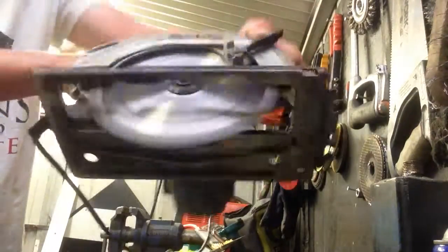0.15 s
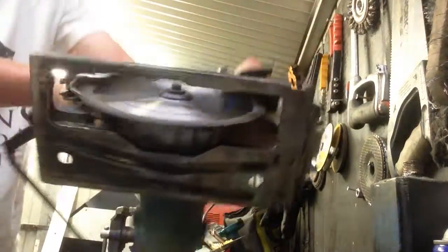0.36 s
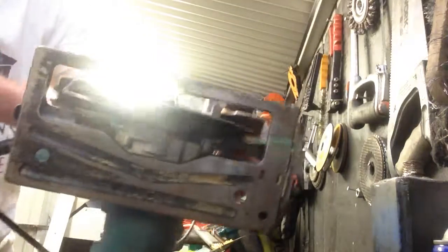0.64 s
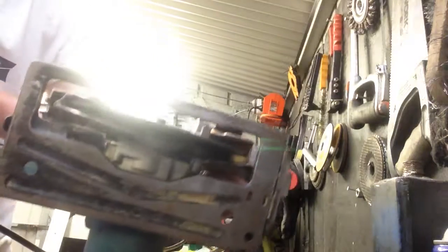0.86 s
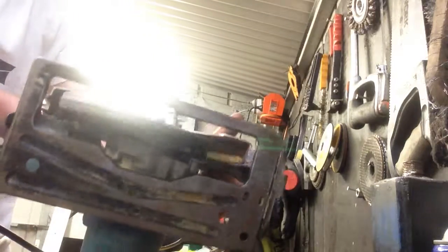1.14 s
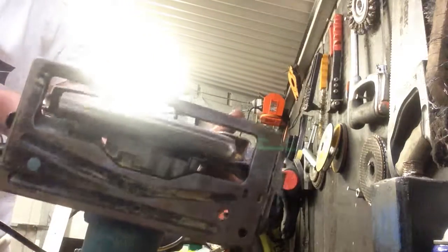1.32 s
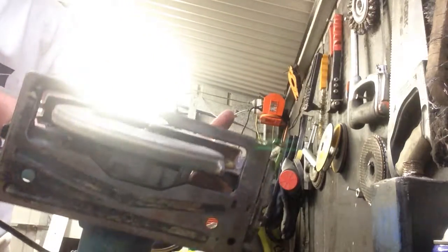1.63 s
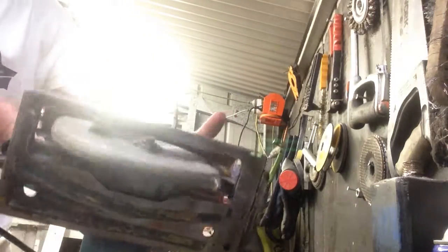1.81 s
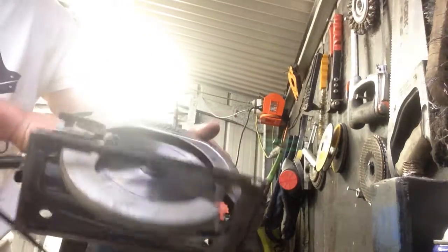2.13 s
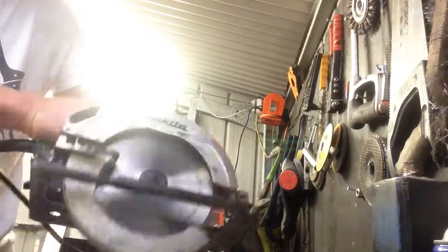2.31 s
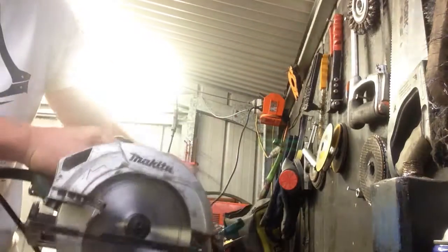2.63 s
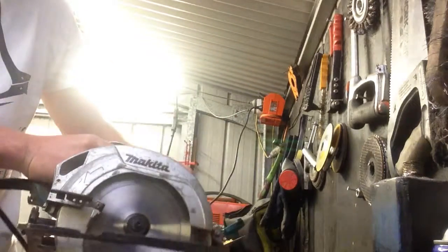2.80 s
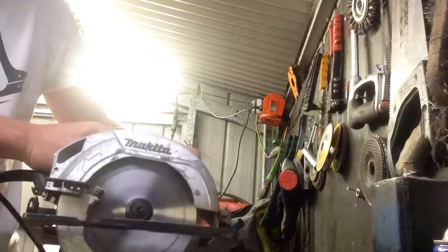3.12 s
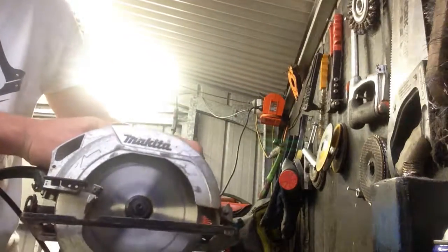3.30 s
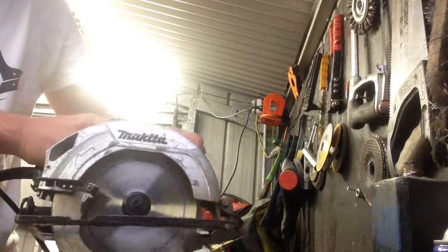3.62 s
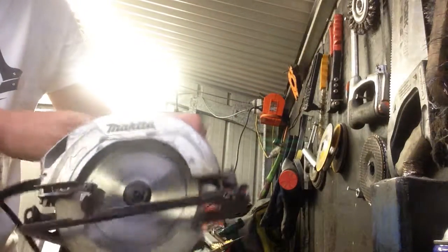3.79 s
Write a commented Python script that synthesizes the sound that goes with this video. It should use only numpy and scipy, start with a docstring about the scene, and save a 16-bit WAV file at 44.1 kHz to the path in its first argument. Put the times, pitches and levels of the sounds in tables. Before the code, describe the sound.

Close recording of a freewheeling circular saw slowing down: bright rattling whine and airy fan rush sink in pitch and level, guard clatters briefly, metal rasps later, with short, dry small-room reflections.

```python
"""Circular saw coasting down

A handheld circular saw coasts with the power off in a small workshop, slowing but still turning at the end.
Worn gears give a falling whine of tooth-rate harmonics and rattle in tone bursts, 27 to 59 a second.
Tooth noise and burst force make the steel blade ring; shaped noise gives fan rush and scraping.
The loose guard's knocks and ticks are short noise blows through resonances."""
import sys
import numpy as np
from scipy import signal
from scipy.fft import rfft, irfft, next_fast_len
from scipy.io import wavfile
from scipy.ndimage import uniform_filter1d

SR = 44100
rng = np.random.default_rng(int(sys.argv[2]) if len(sys.argv) > 2 else 0)


def int16_out(signal):
    """Quantize to a 16-bit WAV file."""
    q = np.round(np.clip(np.atleast_2d(signal).T, -1, 1) * 32767)
    wavfile.write(sys.argv[1], SR, q.astype(np.int16))


N = 174195
T = np.arange(N) / SR  # s

# Workshop background noise [f/Hz, relative density level/dB]
FLOOR = [(20, -39), (30, -27), (45, -3), (70, -2), (130, -0.5), (280, 4), (450, -15), (900, 6),
         (3000, -12.5), (15000, -44)]
# Workshop hum [f/Hz, level/dB]
HUM = [(100, -68.5), (285, -61)]
# Knocks of the guard [t/s, level/dB, contact decay/s, f/Hz, width/Hz]
KNOCKS = [(1.167, -26, 0.0014, 2000, 70), (1.214, -29, 0.0087, 1480, 400), (1.235, -29, 0.0078, 2260, 1640),
          (1.241, -29.5, 0.0019, 1420, 160), (1.245, -26, 0.0054, 1920, 800), (1.265, -32, .005, 1450, 400),
          (1.2856, -23, 0.0023, 1570, 380), (1.299, -36, 0.0029, 1570, 350),
          (1.33, -31.5, 0.0052, 1580, 220), (2.516, -35.5, 0.00066, 2050, 1500),
          (3.042, -43, 0.0018, 2500, 2170), (3.327, -40, 0.00065, 2500, 2200),
          (3.353, -50, 0.0012, 2230, 2200), (3.494, -41, 0.0025, 1820, 1500),
          (3.549, -36, 0.0011, 1700, 1200), (3.569, -38, 0.00079, 2300, 2200),
          (3.773, -43, 0.0032, 1460, 300), (3.882, -38, 0.0037, 1400, 500)]
# What the guard rings with [f/Hz, width/Hz, relative level/dB]
GUARD_MODES = [(1420, 45, -6), (1400, 50, -3), (1743, 33, 17), (1970, 91, 12), (2360, 90, -9),
               (3370, 90, -8)]
# Colour of the fan and blade air [f/Hz, relative density level/dB]
AIR = [(20, -59), (60, -34), (110, -19), (190, -7.5), (270, -5.5), (380, -2), (490, -4.5), (620, 8.5),
       (760, -4), (1300, 9.5), (1600, 1), (2300, 5.5), (4500, -1.5), (8000, -4), (12000, -8), (15500, -16)]
# Light scraping as the blade brushes the guard [t/s, level/dB]
SCRAPE_LEVEL = [(0, -51), (2.38, -30), (2.48, -32), (2.63, -28.5), (2.72, -33), (3.0, -33), (3.5, -33),
                (3.62, -31), (3.95, -39)]
# Colour of that scraping [f/Hz, relative density level/dB]
SCRAPE = [(20, -53), (450, -37), (900, -1), (1300, 19.5), (2400, -1.5), (3200, 4), (4200, 0), (5200, -29),
          (7400, -2), (9500, -10.5), (15000, -24)]
# The harder rub [t/s, level/dB]
RUB_LEVEL = [(0, -66), (2.36, -75), (2.46, -25), (2.53, -31), (2.58, -37), (2.63, -27), (2.7, -65),
             (3.0, -58), (3.95, -68.5)]
# Steel that the rub rings [f/Hz, width/Hz, relative level/dB]
RUB_MODES = [(3048, 110, 0), (3260, 190, 1), (3480, 130, -.5)]
# Noise of the tooth impacts [f/Hz, relative density level/dB]
IMPACTS = [(20, -76), (150, -56), (480, -19), (620, -4.5), (800, 0), (1100, -12.5), (1350, -1), (1800, -2),
           (2200, 4.5), (2600, 5), (3100, 2.5), (5000, -2.5), (7200, -3), (9500, -14), (12000, -25),
           (15500, -23.5)]
# Treble of the fast tooth impacts [f/Hz, relative density level/dB]
SIZZLE = [(20, -64), (7000, -58), (10300, 4), (11400, 12), (12700, -4), (13800, -1), (15200, -8),
          (16000, -18)]
# Blade and housing modes [f/Hz, width/Hz, relative level/dB]
MODES = [(615, 50, -8), (912, 30, -9), (1400, 35, -1), (1650, 40, -6), (2283, 35, -1), (2388, 20, -5),
         (2793, 35, -1), (3048, 45, -3), (3305, 25, -8), (6003, 50, -13), (6910, 60, -12), (7180, 160, -7),
         (11250, 200, -8), (11350, 30, -9), (13700, 250, -15)]
# The blade's strongest ring [f/Hz, width/Hz, relative level/dB]
BLADE_MODES = [(3822, 40, 0), (3896, 50, 1)]
# Swell and fade of that strongest ring [t/s, level/dB]
BLADE_LEVEL = [(0, -31), (.28, -36), (.43, -17), (.56, -17), (.7, -19.5), (.8, -23), (.95, -29.5),
               (1.04, -29.5), (1.16, -35), (1.3, -36), (1.5, -39.5), (1.62, -37), (1.9, -31), (2.0, -36),
               (2.08, -20.5), (2.25, -40.5), (2.42, -34.5), (2.57, -24), (2.7, -36), (2.81, -28.5),
               (2.87, -27.5), (2.95, -26), (3.03, -34), (3.09, -28), (3.24, -32), (3.33, -30.5),
               (3.52, -22), (3.68, -36), (3.88, -25.5), (3.95, -28.5)]
# The blade's thin high ring [t/s, level/dB]
HIGH_RING_LEVEL = [(0, -61), (2.3, -84), (2.42, -37), (2.85, -33), (3.1, -48), (3.68, -42), (3.95, -58)]
# The blade's topmost ring [t/s, level/dB]
TOP_RING_LEVEL = [(0, -34.5), (.22, -35), (.34, -41), (1.2, -69), (1.4, -76), (2.1, -35), (2.3, -57),
                  (2.7, -44), (3.2, -47.5), (3.5, -47), (3.95, -65)]
# Other blade notes that swell briefly [peak t/s, half length to 1/e t/s, f/Hz, level/dB]
SWELLS = [(0.552, .12, 6050, -31), (0.757, 0.36, 2093, -28.5), (1.017, 0.051, 6980, -35),
          (1.318, 0.047, 3334, -23), (1.54, 0.21, 4470, -35), (2.38, 0.29, 2284, -30.5),
          (2.985, 0.15, 2793, -29), (1.95, 0.31, 1380, -29.5), (3.3, 0.21, 1654, -32.5)]
# Bright chirp that each burst draws from the blade [f/Hz, width/Hz, relative level/dB]
CHIRP_MODES = [(7120, 380, 0), (11280, 300, -6)]
# Level of that chirp [t/s, level/dB]
CHIRP_LEVEL = [(0, -43), (1.35, -37.5), (1.5, -36.5), (1.8, -30), (2.05, -47), (2.3, -35.5), (2.5, -47),
               (3.6, -38), (3.8, -34), (3.95, -48)]
# How the casing radiates the gear tones [f/Hz, relative gain level/dB]
CASING = [(500, -27.5), (750, -16.5), (900, 2), (1080, -6), (1350, 4.5), (1700, -4), (2150, -1.5),
          (2550, -8.5), (2820, 3), (3100, 5.5), (3500, -12), (3900, 0.5), (4500, -5.5), (5000, -7),
          (6300, -6.5), (7150, -4), (7600, -4.5), (8300, -0.5), (9500, -11), (15000, -58)]
# Steady part of the whine [multiple of the mesh rate, relative level/dB]
STEADY_ORDERS = [(1, -3), (2, -4), (3, -16)]
# Level of the steady whine [t/s, level/dB]
STEADY_LEVEL = [(0, -32), (.9, -45), (1.2, -34), (1.35, -44), (1.7, -42), (1.9, -37), (2.35, -38),
                (2.55, -35), (2.95, -33.5), (3.3, -32.5), (3.6, -35), (3.95, -34)]
# Rattle rate of the gears [t/s, bursts per second/Hz]
CHATTER = [(0.0, 58.81), (0.45, 52.8), (0.9, 46.34), (1.29, 42.74), (1.34, 33.62), (1.45, 33.7),
           (1.5, 40.87), (1.7, 36.93), (2.0, 34.46), (2.14, 33.66), (2.22, 31.31), (2.43, 32.15),
           (2.5, 58.39), (3.15, 45.41), (3.47, 42.35), (3.54, 51.01), (3.61, 39.31), (3.77, 26.9),
           (3.88, 47.33), (3.95, 42.68)]
# Force of the bursts [t/s, relative level/dB]
BURST_LEVEL = [(0, 4.5), (.2, 5.5), (.48, 3), (.6, 0.5), (1.0, 1.5), (1.3, 0), (1.45, -0.5), (1.75, -1),
               (2.1, 1), (2.4, 2), (2.48, -3.5), (2.75, -7.5), (3.05, -2.5), (3.3, -3.5), (3.6, -4.5),
               (3.8, -2.5), (3.95, -0.5)]
# Gear contact between the bursts, on the same force scale [t/s, relative level/dB]
RUNNING = [(0, -21), (.6, -3), (1.05, -3), (1.25, 0.5), (1.36, -10), (2.0, -9.5), (2.4, -24), (2.5, -7.5),
           (2.85, -10), (3.1, -9.5), (3.55, -11), (3.7, -11), (3.95, -11)]
# Tone of a burst [multiple of its rate, relative level/dB at full speed, relative level/dB at half speed]
ORDERS = [(1, 11, 7.5), (2, 11.5, 8), (3, 8.5, 4), (4, 5.5, 1.5), (5, 1.5, 0), (6, -23, 0), (7, -20, -5.5)]
# How many times more uneven the bursts are while the blade rubs [t/s, factor]
UNEVEN = [(0, 1), (2.42, 1), (2.5, 4), (2.75, 4), (2.9, 2), (3.1, 4), (3.5, 3), (3.6, 1), (3.95, 1)]

FLOOR_DB = -51.5
ROOM_DB, ROOM_T60_S, ROOM_TREBLE_T60_S = -7.5, 0.18, 0.06  # level is relative to the dry saw
KNOCK_CRACK, GUARD_RING = 0.39, 0.41  # mix gains beside the pitched knock
GUARD_LOW_HZ = 1100
AIR_DB, AIR_SPEED_POWER = -25, 1.6  # level at full speed
SCRAPE_GRAIN_DB, SCRAPE_GRAIN_HZ = 4, 220
SCRAPE_LUMP_DB, SCRAPE_LUMP_HZ = 2, 25
SIZZLE_DB, SIZZLE_SPEED_POWER = -34.5, 3  # level at full speed
IMPACT_DB, TOOTH_SHARPNESS, TOOTH_SPREAD_DB = -30, 0.5, 1.5  # sharpness is decay per tooth

HIGH_RING_HZ, HIGH_RING_WIDTH_HZ = 7332, 26
TOP_RING_HZ, TOP_RING_WIDTH_HZ = 11349, 40
SWELL_WIDTH_HZ, THROB_S, SING_WAVER = 69, 0.0042, 0.33
BLADE_PULSE, HIGH_PULSE, SWELL_PULSE = 0.86, 0.65, 0.95  # share of level that follows the bursts
BLADE_FLUTTER_DB, HIGH_FLUTTER_DB, FLUTTER_HZ = 1.3, 2.5, 16
MODES_DB, SWEPT_DB = -40, -45.5

MESH_START_HZ, DRAG_S, FRICTION_HZ_PER_S = 2250, 6.9, 218.8
PINION_TEETH, PINION_UNEVEN = 7, 1
STEADY_WANDER = 0.37  # rad for the first harmonic
WHINE_DB, WHINE_WANDER, WANDER_HZ = -26, 0.65, 110  # bursts' tone level, phase wander in rad, its rate

CHATTER_START = 0.4  # cycles
BURST_RISE_S, BURST_FALL_S, BURST_RING_S = 0.0023, 0.0055, 0.007
BURST_SPREAD_DB, BURST_JITTER_S = 0.9, 0.0005  # while UNEVEN is 1
BURST_DETUNE = 0.019  # fraction of the mesh rate
# At high speed the teeth bounce harder, which blurs the harmonics
FAST_BLUR, BLUR_ENDS = 0.8, 0.7  # depth, and slowing (1 is half speed) at which it is gone
EDGE_HZ = 15650


def amp(db):
    """Decibels to a linear gain."""
    return 10 ** (np.asarray(db) / 20)


def unit(x):
    """Scale to an rms of one."""
    return x / np.sqrt(np.mean(x ** 2) + 1e-20)


def curve(points):
    """Straight-line automation through the points."""
    return np.interp(T, *np.transpose(points))


def colour(x, points):
    """Causal minimum-phase filter with the given spectral shape."""
    size = next_fast_len(N + 8192)
    hz, db = np.transpose(points)
    bins = abs(np.fft.fftfreq(size, 1 / SR))
    log_gain = np.log(amp(np.interp(np.log(bins + 1), np.log(hz), db)))
    response = np.exp(np.conj(signal.hilbert(log_gain)))
    return np.fft.ifft(np.fft.fft(x, size) * response).real[:N]


def wander(hz):
    """Smooth random drift, mostly below the given rate."""
    spectrum = rfft(rng.standard_normal(N))
    return unit(irfft(spectrum / (1 + (np.fft.rfftfreq(N, 1 / SR) / hz) ** 4), N))


def high_pass(x, order, hz):
    """Butterworth cut of the low end."""
    return signal.sosfilt(signal.butter(order, hz, "high", fs=SR, output="sos"), x)


def ring(x, modes):
    """Sum of damped resonances, each with its own share of the energy."""
    out = 0
    for hz, width, db in modes:
        pole = np.exp((-np.pi * width + 2j * np.pi * hz) / SR)
        even_energy = np.sqrt(1 - abs(pole) ** 2)
        out = out + amp(db) * even_energy * signal.lfilter([1], [1, -pole], x).real
    return out


def sung(x, modes):
    """Pure ringing of the given modes, with its level evened out."""
    tone = 0
    for hz, width, db in modes:
        mode = [(hz, width, 0)]
        tone = tone + amp(db) * unit(ring(ring(x, mode), mode))
    local_power = abs(uniform_filter1d(tone ** 2, size=700))
    return tone / np.sqrt(local_power + SING_WAVER * np.mean(tone ** 2))


def background():
    """Faint room noise, and hum tones whose phase drifts slowly."""
    out = amp(FLOOR_DB) * unit(colour(rng.standard_normal(N), FLOOR))
    for hz, db in HUM:
        out = out + amp(db) * unit(np.sin(2 * np.pi * hz * T + 0.5 * wander(4.1)))
    return out


def workshop(x):
    """Dense reflections of a small cluttered room; the treble dies first."""
    t = T[:SR // 2]
    taps = rng.standard_normal(len(t)) * (rng.random(len(t)) < 3000 / SR) * (t > 0.003)
    low = signal.sosfilt(signal.butter(2, 3500, fs=SR, output="sos"), taps)
    high = high_pass(taps, 1, 3500)
    tail = low * amp(-60 * t / ROOM_T60_S) - 1.85 * high * amp(-60 * t / ROOM_TREBLE_T60_S)
    return amp(ROOM_DB) * x.std() * unit(signal.fftconvolve(x, tail)[:N])


def guard():
    """The loose guard knocks and ticks; each blow has the pitch of the spot that it strikes."""
    out, t = np.zeros(N), T[:4096]
    noises = rng.standard_normal((len(KNOCKS), len(t)))
    for (s, db, contact, hz, width), noise in zip(KNOCKS, noises):
        blow = ring(noise * np.exp(-t / contact), [(hz, width, 0)])
        knock = unit(ring(blow, [(hz, 2 * width, 0)]))
        knock = knock + KNOCK_CRACK * unit(blow) + GUARD_RING * unit(ring(blow, GUARD_MODES))
        part = out[int(s * SR):][:len(t)]
        part += amp(db) * unit(high_pass(knock, 4, GUARD_LOW_HZ))[:len(part)]
    return out


def mesh_rate():
    """Teeth per second, slowed by air drag and steady friction."""
    brake = FRICTION_HZ_PER_S * DRAG_S
    return (MESH_START_HZ + brake) * np.exp(-T / DRAG_S) - brake


def air(mesh):
    """The rush of fan and blade weakens as the speed falls."""
    speed = mesh / MESH_START_HZ
    return amp(AIR_DB) * speed ** AIR_SPEED_POWER * unit(colour(rng.standard_normal(N), AIR))


def scrape():
    """Grainy metallic rubbing in uneven lumps, and a harder rub that makes the steel rasp."""
    grain_db = SCRAPE_GRAIN_DB * wander(SCRAPE_GRAIN_HZ)
    lump_db = SCRAPE_LUMP_DB * wander(SCRAPE_LUMP_HZ)
    grains = rng.standard_normal(N) * amp(grain_db + lump_db)
    rasp = amp(curve(RUB_LEVEL)) * unit(ring(ring(grains, RUB_MODES), RUB_MODES))
    return amp(curve(SCRAPE_LEVEL)) * unit(colour(grains, SCRAPE)) + rasp


def tooth_impacts(mesh, force):
    """A short puff of noise for every tooth, each of its own strength."""
    teeth = np.cumsum(mesh) / SR
    strength = amp(TOOTH_SPREAD_DB * rng.standard_normal(N))[teeth.astype(int)]
    puff = np.exp(-TOOTH_SHARPNESS * (teeth % 1))
    return unit(force * strength * puff * rng.standard_normal(N))


def sizzle(impacts, mesh):
    """At high speed the teeth strike harder and add top treble."""
    speed = mesh / MESH_START_HZ
    return amp(SIZZLE_DB) * speed ** SIZZLE_SPEED_POWER * unit(colour(impacts, SIZZLE))


def blade(impacts, force):
    """The steel disc sings in narrow modes that swell and fade, throbbing with the gear bursts."""
    push = signal.lfilter([1], [1, -np.exp(-1 / (SR * THROB_S))], force)
    push = push / np.sqrt(abs(uniform_filter1d(push ** 2, size=6000)) + 1e-12)
    drive = rng.standard_normal(N)

    throb = 1 - BLADE_PULSE + BLADE_PULSE * push
    flutter = amp(BLADE_FLUTTER_DB * wander(FLUTTER_HZ))
    out = sung(drive, BLADE_MODES) * amp(curve(BLADE_LEVEL)) * throb * flutter

    high_throb = 1 - HIGH_PULSE + HIGH_PULSE * push
    high_motion = high_throb * amp(HIGH_FLUTTER_DB * wander(FLUTTER_HZ))
    high_ring = sung(drive, [(HIGH_RING_HZ, HIGH_RING_WIDTH_HZ, 0)])
    top_ring = sung(drive, [(TOP_RING_HZ, TOP_RING_WIDTH_HZ, 0)])
    out = out + high_ring * amp(curve(HIGH_RING_LEVEL)) * high_motion
    out = out + top_ring * amp(curve(TOP_RING_LEVEL)) * high_motion

    for s, length, hz, db in SWELLS:
        swell = amp(db) * np.exp(-((T - s) / length) ** 2)
        swell = swell * (1 - SWELL_PULSE + SWELL_PULSE * push)
        out = out + swell * sung(drive, [(hz, SWELL_WIDTH_HZ, 0)])
    return out + amp(MODES_DB) * unit(ring(impacts, MODES))


def chirps(force):
    """Each burst's force excites bright blade modes with noise."""
    hiss = force * rng.standard_normal(N)
    return amp(curve(CHIRP_LEVEL)) * unit(ring(ring(hiss, CHIRP_MODES), CHIRP_MODES))


def whine(mesh):
    """Steady harmonics of the tooth rate; the pinion's unequal teeth split them into side tones."""
    teeth = np.cumsum(mesh) / SR
    tone = 0
    for k, db in STEADY_ORDERS:
        uneven = 0
        for j in range(1, PINION_TEETH):
            uneven = uneven + np.cos(2 * np.pi * (j * teeth / PINION_TEETH + rng.random())) / j
        phase = 2 * np.pi * k * teeth + STEADY_WANDER * np.sqrt(k) * wander(WANDER_HZ)
        tone = tone + amp(db) * (1 + PINION_UNEVEN * unit(uneven)) * np.cos(phase)
    return amp(curve(STEADY_LEVEL)) * unit(colour(tone, CASING))


def bursts(mesh):
    """As the backlash closes, teeth bounce for milliseconds, a little off the mesh rate: force and tone."""
    cycles = np.cumsum(curve(CHATTER)) / SR + CHATTER_START
    times = T[1:][np.diff(np.floor(cycles)) > 0]
    force, tone = np.zeros((2, N))
    shakes = [WHINE_WANDER * wander(WANDER_HZ) for _ in ORDERS]
    draws = rng.standard_normal((len(times), 3 + len(ORDERS)))
    for s, (strength, late, detune, *phases) in zip(times, draws):
        near = slice(max(int((s - 0.02) * SR), 0), int((s + 0.04) * SR))
        uneven = np.interp(s, *np.transpose(UNEVEN))
        age = T[near] - s - late * uneven * BURST_JITTER_S
        after = np.maximum(age, 0)
        size = amp(BURST_SPREAD_DB * np.sqrt(uneven) * strength)
        rise = size * np.exp(-(np.minimum(age, 0) / BURST_RISE_S) ** 2 / 2)
        force[near] += rise * np.exp(-(after / BURST_FALL_S) ** 1.08)

        hz = mesh[int(s * SR)] * (1 + BURST_DETUNE * detune)
        slowed = np.clip(2 * (1 - hz / MESH_START_HZ), 0, 1)  # 0 at full speed, 1 at half
        fast = max(1 - slowed / BLUR_ENDS, 0)
        for (k, fast_db, slow_db), phase, shake in zip(ORDERS, phases, shakes):
            fall = np.exp(-(after * k ** 0.3 / BURST_RING_S) ** 1.3)  # upper harmonics die sooner
            level = amp(fast_db + (slow_db - fast_db) * slowed)
            blur = (1 + FAST_BLUR * np.sqrt(k) * fast) * shake[near]
            tone[near] += rise * fall * level * np.cos(2 * np.pi * (k * hz * age + phase) + blur)
    level = amp(curve(BURST_LEVEL))
    return force * level, tone * level


def scene():
    """Gears, steel and air in the room."""
    mesh = mesh_rate()
    force, burst_tone = bursts(mesh)
    impacts = tooth_impacts(mesh, force + amp(curve(RUNNING)))
    tones = whine(mesh) + amp(WHINE_DB) * unit(colour(burst_tone, CASING))
    swept = amp(SWEPT_DB) * unit(ring(tones, MODES))  # modes answer as the whine slides past them
    steel = high_pass(blade(impacts, force) + swept + chirps(force) + guard(), 2, 350)
    impact_noise = amp(IMPACT_DB) * unit(colour(impacts, IMPACTS))
    saw = tones + impact_noise + sizzle(impacts, mesh) + steel + scrape() + air(mesh)
    return (saw + workshop(saw) + background())[None]


def record(dry):
    """A steep linear-phase low-pass limits the band."""
    low_pass = signal.firwin(511, EDGE_HZ, window=("kaiser", 9), fs=SR)
    return signal.oaconvolve(dry, low_pass[None], "same")


dry = scene()
out = record(dry)
int16_out(out)
```